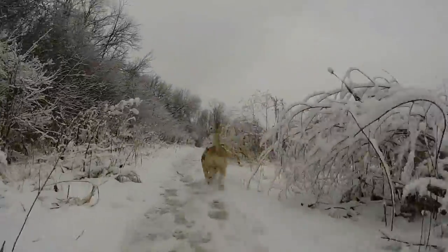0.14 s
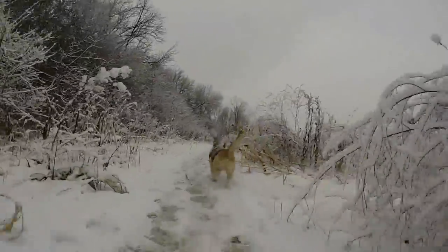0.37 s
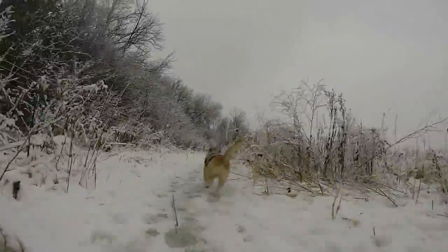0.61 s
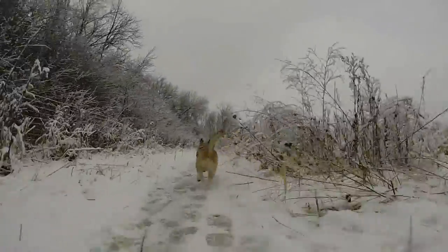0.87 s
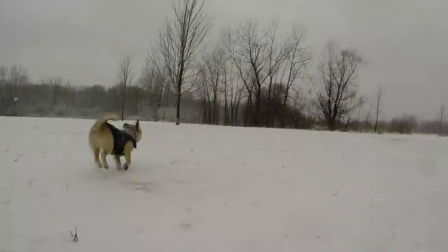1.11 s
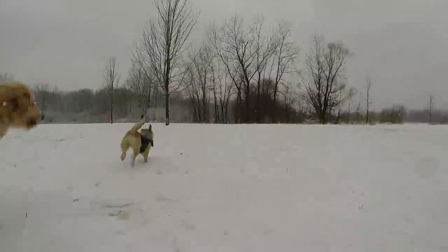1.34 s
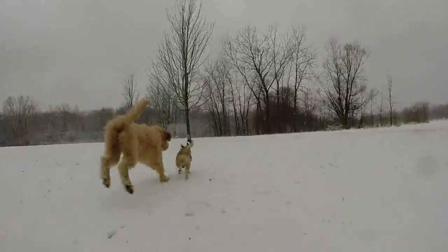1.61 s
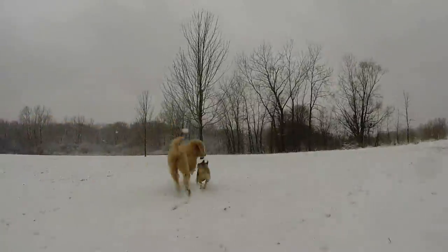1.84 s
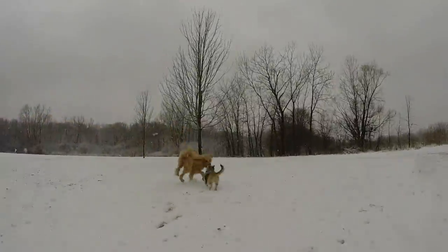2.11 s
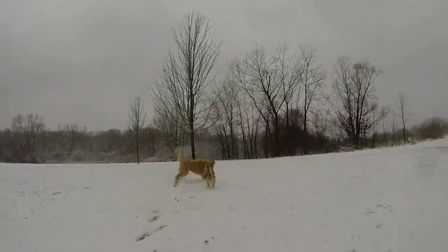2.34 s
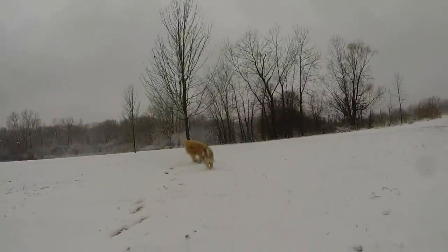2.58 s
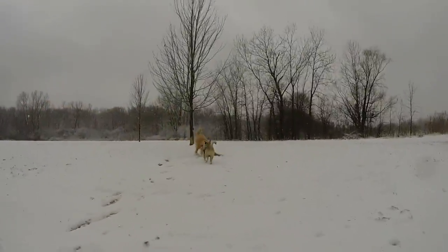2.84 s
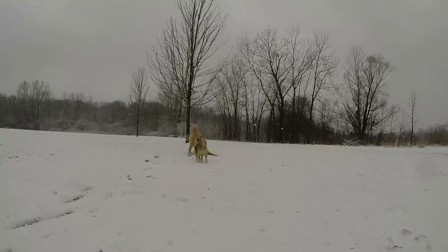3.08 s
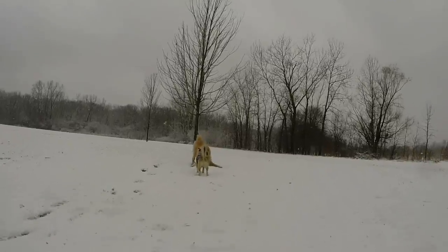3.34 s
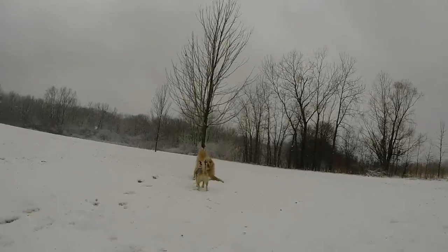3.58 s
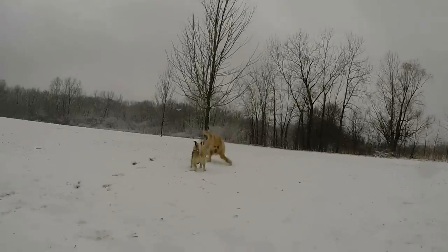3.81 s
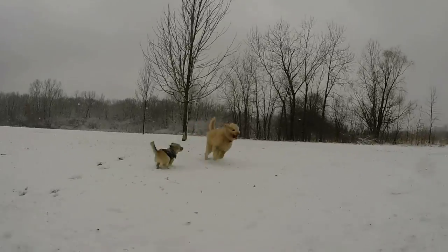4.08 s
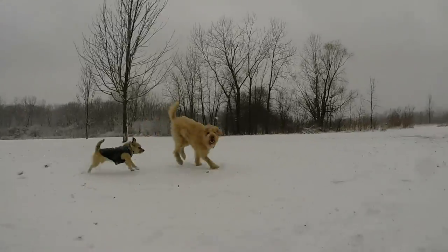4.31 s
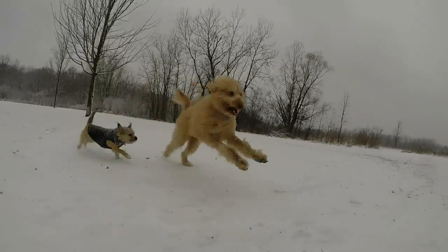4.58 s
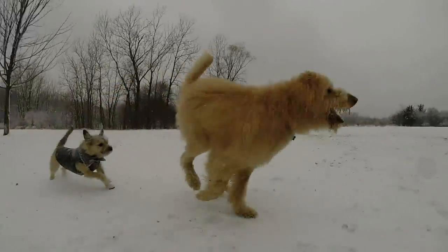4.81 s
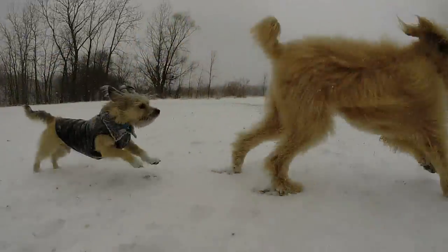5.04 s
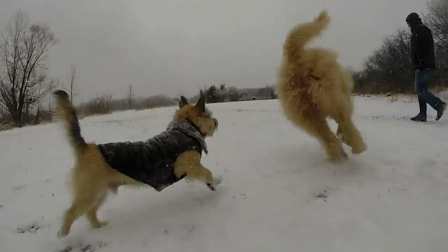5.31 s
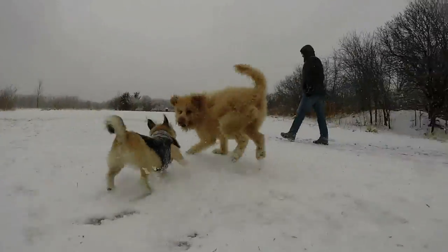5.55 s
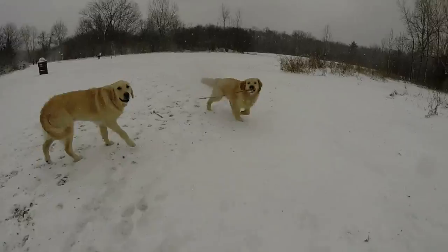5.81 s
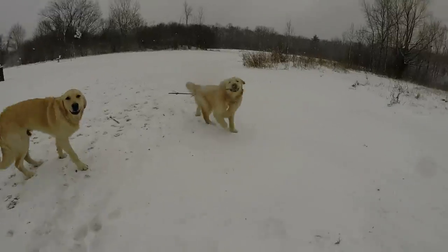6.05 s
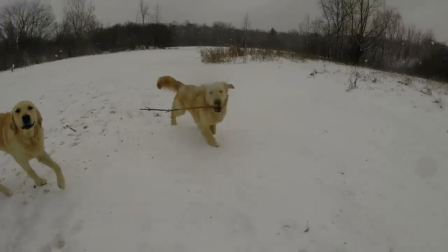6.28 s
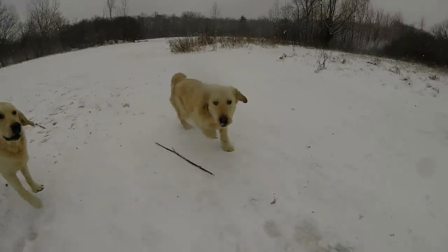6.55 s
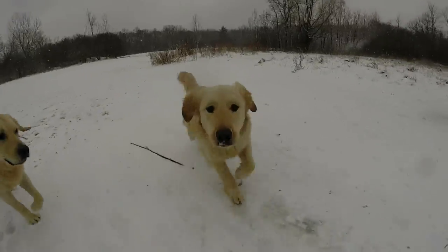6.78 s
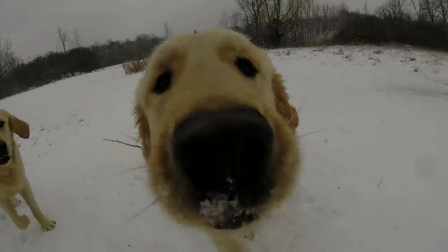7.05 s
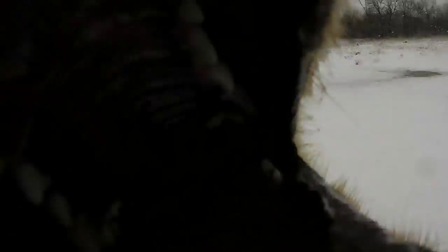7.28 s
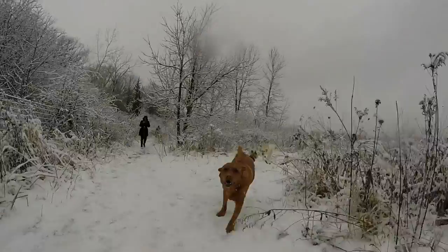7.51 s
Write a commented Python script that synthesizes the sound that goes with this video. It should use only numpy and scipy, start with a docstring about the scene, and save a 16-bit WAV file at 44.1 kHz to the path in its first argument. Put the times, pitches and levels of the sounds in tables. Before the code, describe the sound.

Close, muffled, single-channel outdoor sound from inside a hard case: deep uneven wind buffeting over faint hiss, light crackling snow and small sharp plastic snaps. Treads are firmest at the start, then sparse. A faint low growl and later a stronger short one pass among playing dogs. Near the end come soft quick paws, a fur scrape, then an abrupt cluster of very loud, distorted thumps and rattles as the dog mouths the camera.

```python
"""Wind rumble, crunching snow and sharp ticks: a small camera in a closed plastic case is carried over
a snowy field among playing dogs. Shaped noise makes the wind; grains and snaps ring the case resonances.
A click sounds early on; a wavering tone growls briefly, twice. At the end a dog runs up with a swish,
brushes the case and knocks it with its mouth until the input overloads: pushes and rattles, clipped."""
import sys
import numpy as np
from scipy import signal
from scipy.fft import rfft, irfft
from scipy.io import wavfile
from scipy.ndimage import uniform_filter1d

SR = 44100
rng = np.random.default_rng(int(sys.argv[2]) if len(sys.argv) > 2 else 0)


def pcm_store(signal):
    """Save signal as 16-bit PCM."""
    levels = np.round(np.clip(np.atleast_2d(signal), -1, 1) * 32767)
    wavfile.write(sys.argv[1], SR, levels.astype(np.int16).T)


def decibels_to_gain(level_db):
    """Convert a level in decibels to a linear amplitude gain (20 dB per decade)."""
    exponent = np.asarray(level_db, float) / 20
    return 10 ** exponent


N = 337412

# Hiss spectrum, shape only. Each row: frequency in Hz, density in dB per Hz.
HISS_SPECTRUM = [(60, -20), (150, -0.5), (844, -6.5), (1570, -11), (4480, -16.5), (8000, -26.5),
                 (12000, -28.5), (13500, -38.5), (15500, -61.5)]
HISS_DB = -62.5

# Wind and swinging of the camera. Each row: time in seconds, heave level in dB.
WIND_HEAVE = [(0.0, -26), (0.38, -38.5), (0.43, -25.5), (0.55, -25.5), (0.62, -36), (0.83, -34),
              (1.51, -38), (2.71, -32.5), (3.32, -46.5), (3.39, -36), (4.79, -34), (4.83, -24.5),
              (5.35, -36.5), (5.6, -27), (5.77, -45.5), (6.2, -49.5), (7.48, -24), (7.65, -29)]
# Slow pressure lumps, shape only. Each row: frequency in Hz, density in dB per Hz.
HEAVE_SPECTRUM = [(8, -20.5), (12, 19), (30, 16.5), (45, 3), (65, 4), (90, -51), (200, -96)]
# Smaller eddies, shape only. Each row: frequency in Hz, density in dB per Hz.
FLUTTER_SPECTRUM = [(35, -3), (55, -8), (100, -3.5), (170, -11.5), (300, -28), (600, -25.5), (3000, -77)]
# Flutter level at a heave of CALM_DB, and its rise per dB of heave.
FLUTTER_DB, FLUTTER_DB_PER_DB, CALM_DB = -52.5, 0.57, -33

# Case resonances, nominal: sources rescale them. Each row: frequency in Hz, width in Hz, level in dB.
CASE_MODES = [(860, 320, -0.5), (1615, 310, 7), (2300, 496, 4), (2816, 364, 1), (4153, 890, -4.5),
              (6020, 840, -6.5), (6760, 3200, -19), (10600, 8500, -25.5)]

# Steady shuffle through the snow. Each row: time in seconds, crunch level in dB.
SHUFFLE = [(0.0, -62.5), (1.2, -60), (3.02, -64.5), (5.72, -57.5), (5.77, -67.5), (6.56, -65), (7.1, -59)]
# Brightness at a crunch of SHUFFLE_DB, and its rise per dB of crunch.
BRIGHT_DB, BRIGHT_DB_PER_DB, SHUFFLE_DB = -72, 1.1, -59
# Treads in the snow. Each row: time in seconds, swell over the last 20 dB in ms, crunch level in dB,
# brightness level in dB.
SNOW_TREADS = [(0.01, 44, -41.5, -82), (0.408, 4.2, -45, -59), (.458, 12, -55.5, -87),
               (0.498, 6.8, -55, -82), (0.798, 1.3, -45.5, -63), (0.854, 14, -55, -83),
               (1.267, 4.2, -63, -61), (1.345, 8.4, -79, -60.5), (1.499, 47, -54.5, -66),
               (1.62, 75, -59, -95), (2.54, 130, -63, -81), (3.57, 16, -60, -93), (4.389, 47, -65, -75),
               (4.85, 28, -86, -70), (5.058, 76, -90, -57), (5.217, 26, -57, -53.5), (5.489, 75, -83, -57),
               (5.71, 76, -63.5, -75)]
TREAD_HOLD_MS, TREAD_FALL_20DB_MS = 22, 28   # the snow keeps breaking, then falls 20 dB
# Fur brushes along the case, presses hard, lifts off. Each row: time in seconds, pressure level in dB,
# brightness level in dB.
FUR_BRUSH = [(7.15, -90, -71), (7.197, -59.5, -48), (7.235, -55, -52), (7.256, -46, -61), (7.266, -33, -70),
             (7.294, -26.5, -34), (7.313, -35, -57), (7.321, -60, -76), (7.355, -55, -56)]

# Sharp ticks. Each row: time in seconds, treble peak in dB, body level in dB, body pitch in Hz.
SHARP_TICKS = [(0.0177, -53, -37.5, 2280), (0.2668, -36, -52.5, 2370), (0.528, -42, -54, 2410),
               (0.5387, -34.5, -48, 3540), (0.596, -35.5, -54, 4200), (0.6143, -57, -44.5, 1580),
               (0.6524, -55, -45, 1580), (0.717, -56, -49.5, 1700), (0.771, -52, -47, 1730),
               (0.7972, -52, -49, 2270), (0.818, -37, -47, 4300), (0.8218, -62, -39, 1530),
               (0.8665, -58, -44.5, 1700), (0.9003, -27, -46.5, 2250), (0.949, -50, -62, 4200),
               (0.973, -45, -51, 2390), (1.0301, -38, -61, 4200), (1.1779, -16.5, -27.5, 2400),
               (1.2, -51, -53, 4070), (1.2545, -45, -40, 1910), (1.51, -61, -47, 2280),
               (1.712, -26, -34, 3600), (1.722, -36, -65, 4600), (2.176, -58, -52, 2970),
               (2.361, -46, -41.5, 2390), (2.4034, -40, -49.5, 1670), (2.532, -42, -44, 2500),
               (2.619, -51, -46, 1830), (2.74, -62, -56, 2400), (3.0002, -53, -46.5, 1700),
               (3.1422, -37, -48, 4700), (3.6577, -39.5, -39, 2330), (4.1728, -17.5, -27, 2900),
               (4.2058, -47, -51, 1630), (4.5042, -61, -49.5, 1700), (4.998, -38, -52, 4760),
               (5.1694, -35, -45.5, 2480), (5.1856, -36, -53, 2450), (5.2149, -47, -48, 1520),
               (5.257, -41, -57, 1810), (5.3066, -43, -47.5, 2360), (5.3148, -34, -53, 1910),
               (5.4037, -44, -51, 2400), (5.6455, -25, -34.5, 2670), (5.689, -59, -45.5, 1590),
               (6.11, -53, -57.5, 3530), (6.5412, -64, -52, 3800), (6.654, -66, -52.5, 2800),
               (6.8615, -43, -53, 2010), (6.9624, -65, -31.5, 3000), (7.232, -40, -47.5, 1660),
               (7.2462, -46, -38.5, 1730)]
# Faint ticks at random moments: rate, least body level at SHUFFLE_DB, lowest pitch and its range.
FAINT_PER_S, FAINT_DB, FAINT_HZ, FAINT_OCTAVES = 12, -61.5, 1560, 1.1

# A click at 1.109 s, then knocks on the case; values before filtering. Each row: time in seconds,
# push height (full scale 1), push width at half height in ms, rattle level in dB, rattle length in ms.
CLICK_AND_KNOCKS = [(1.109, -.02, 1.2, -34.5, 0.78), (3.772, .006, 0.79, -45.5, 4),
                    (6.9613, .004, 0.72, -34, 5.9), (7.3618, 1.12, 2.25, 8, 3.33),
                    (7.365, -0.62, 4.4, -16.5, 16.6), (7.3886, -0.84, 0.79, -12.5, 2.7),
                    (7.41, 0.0091, 5.9, -26.5, 7.4), (7.4185, -0.63, 1.04, -12, 2.3),
                    (7.428, 0.068, 3.2, -25, 10.9), (7.4446, 0.2, 2.4, -7, 1.6),
                    (7.448, 0.58, 3.57, -10, 1.45), (7.4564, -0.11, 1.3, -16, 2.6),
                    (7.4571, 0.21, 3.25, -36, 2.3), (7.462, -1.73, 0.96, -1.5, 1.5),
                    (7.4641, 0.011, 1.4, -11.5, 1.5), (7.4672, 0.75, 2.07, -16.5, 6.1),
                    (7.496, -0.22, 6.2, -33, 12), (7.502, 0.42, 4, -11.5, 4.6),
                    (7.5061, -1.56, 0.72, -4.5, 2.4), (7.5077, 0.8, 0.63, -30, 2),
                    (7.51, -0.64, 0.66, -13, 4.9)]
RATTLE_FALL_DB = 10.5   # over the length of a rattle
RATTLE_TAIL_DB, RATTLE_TAIL_MS = -28.5, 36   # a faint buzz lingers; time constant

# Growls. Each row: loudest moment in seconds, pitch in Hz, level before a 2 dB lift in dB,
# length in seconds, lower partial against the tone in dB.
GROWLS = [(3.559, 220, -49.5, 0.12, 3.5), (5.39, 223, -35.5, 0.286, -13)]
GROWL_EDGE_DB, GROWL_SAG_SHARE = -15.5, .07   # at both ends: level below the top, share the pitch sinks
RASP_HZ, RASP_WIDTH_HZ, RASP_DB = 370, 100, -23   # breathy top of the growl

# A dog runs up to the camera. Each row: time in seconds, level in dB.
RUN_UP = [(6.62, -71), (6.71, -50), (6.765, -56), (6.8, -48), (6.885, -63.5), (6.94, -55.5), (7.05, -68)]
# Swish round the legs, relative levels. Each row: frequency in Hz, width in Hz, level in dB.
SWISH_MODES = [(1940, 280, 13.5), (2320, 150, 0), (2900, 310, -3), (4000, 410, -19)]
PAWS_HZ, PAWS_WIDTH_HZ, PAWS_DB = 181, 122, 2   # level against the swish


def rms_one(x):
    """Scale to rms 1."""
    return x / np.sqrt(np.mean(x ** 2) + 1e-20)


def in_time(rows):
    """Columns of a table, interpolated to one value a sample."""
    s, *columns = np.transpose(rows)
    return [np.interp(np.arange(N) / SR, s, column) for column in columns]


def coloured(spectrum):
    """Noise with the given spectrum; rms 1."""
    hz, db = np.transpose(spectrum)
    grid_hz = np.arange(1, N // 2 + 2) * SR / N
    gain = decibels_to_gain(np.interp(np.log(grid_hz), np.log(hz), db))
    return rms_one(irfft(rfft(rng.standard_normal(N)) * gain, N))


def drift(rate_hz):
    """Slow chance: noise through a two-pole low-pass, spread 1."""
    r = np.exp(-2 * np.pi * rate_hz / SR)
    return rms_one(signal.lfilter([1], [1, -2 * r, r * r], rng.standard_normal(N + SR))[SR:])


def resonance(x, hz, width_hz):
    """Two-pole resonance, gain 1 on top."""
    r = np.exp(-np.pi * width_hz / SR)
    return signal.lfilter([1 - r, 0, r - 1], [1, -2 * r * np.cos(2 * np.pi * hz / SR), r * r], x)


def evened(x, span_s):
    """Pull the envelope towards 1: lumps of alike height."""
    power = uniform_filter1d(x ** 2, size=int(span_s * SR))
    return rms_one(x / (power + 1e-3) ** 0.175)


def hiss():
    """Steady faint noise of fixed spectrum."""
    return decibels_to_gain(HISS_DB) * coloured(HISS_SPECTRUM)


def wind():
    """Slow pressure lumps heave the diaphragm, smaller eddies flutter on top."""
    heave_db, = in_time(WIND_HEAVE)
    heave = evened(coloured(HEAVE_SPECTRUM), span_s=0.25)
    flutter = rms_one(coloured(FLUTTER_SPECTRUM) * decibels_to_gain(3.06 * drift(26)))
    flutter_db = FLUTTER_DB + FLUTTER_DB_PER_DB * (heave_db - CALM_DB)
    return decibels_to_gain(heave_db) * heave + decibels_to_gain(flutter_db) * flutter


def pressure():
    """Gains for the low and the high resonances from shuffle, treads and brush."""
    t = np.arange(N) / SR
    shuffle_db, = in_time(SHUFFLE)
    bright_db = BRIGHT_DB + BRIGHT_DB_PER_DB * (shuffle_db - SHUFFLE_DB)
    gains = decibels_to_gain(np.array([shuffle_db, bright_db]))
    touching = (t > FUR_BRUSH[0][0]) & (t < FUR_BRUSH[-1][0])
    gains = gains + touching * decibels_to_gain(np.array(in_time(FUR_BRUSH)))
    for s, swell_ms, low_db, high_db in SNOW_TREADS:
        before = (s - t) / swell_ms
        after = np.maximum(t - s - TREAD_HOLD_MS / 1000, 0) / TREAD_FALL_20DB_MS
        shape_db = np.maximum(-20000 * np.maximum(before, after), -200)   # 20 dB, 1000 ms a second
        gains = gains + decibels_to_gain([[low_db], [high_db]]) * decibels_to_gain(shape_db)
    return gains


def crunch():
    """Dense clumped grains ring the case; bright grains reach its upper resonances."""
    low, high = pressure()
    clumpy_db = 4.5 * np.clip(decibels_to_gain(-54.5) / low, .3, 1)   # firm treads break snow without pause
    sizes = decibels_to_gain(2.23 * np.minimum(rng.exponential(1, N), 5)) * rng.choice([-1, 1], N)
    per_s = 1600 * decibels_to_gain(clumpy_db * drift(30))
    grains = rms_one(sizes * (rng.random(N) < per_s / SR))
    place = rng.integers(0, 3, N)   # each grain favours some resonances
    fine = 0.42 * rng.standard_normal(N)
    parts = []
    for k, (hz, width_hz, db) in enumerate(CASE_MODES):
        struck = grains * (0.12 + 2.7 * (place == k % 3)) + fine
        parts.append(decibels_to_gain(db + 1.8 * drift(10.5)) * resonance(struck, hz, 0.76 * width_hz))
    # firm pressure brings out the fourth resonance, dulls the third and damps the lowest
    parts[3] = parts[3] * np.clip(low / decibels_to_gain(-42), 1, 2)
    parts[2] = parts[2] * np.clip(decibels_to_gain(-42) / low, .55, 1)
    parts[0] = parts[0] * np.clip(decibels_to_gain(-46.0) / low, .3, 1)
    muffle = signal.butter(2, 7600, fs=SR, output="sos")   # the upper resonances fall away above about 7.6 kHz
    dull = signal.sosfilt(muffle, sum(parts[4:]))
    # packed snow gives a soft low body, weaker under firm pressure
    thud = decibels_to_gain(-6.0) * rms_one(resonance(resonance(grains + fine, 185, 180), 185, 180))
    thud = np.minimum(1, decibels_to_gain(-54.5) / low) * thud
    return low * (rms_one(sum(parts[:4])) + thud) + high * rms_one(dull)


def faint_ticks():
    """Random rows like SHARP_TICKS; their levels follow the shuffle."""
    rows = []
    for share, a, b, c in rng.random((round(FAINT_PER_S * N / SR), 4)):
        s = share * N / SR
        base_db = FAINT_DB + np.interp(s, *np.transpose(SHUFFLE)) - SHUFFLE_DB
        hz = FAINT_HZ * 2 ** (FAINT_OCTAVES * b ** 2)
        rows.append((s, base_db - 10 + 16 * c, base_db + 5 * a, hz))
    return rows


def ticks():
    """A millisecond of crackle rings its own pitch and the case; body and treble have their own strength."""
    size = 2048
    out, t = np.zeros(N + size), np.arange(size) / SR
    rows = list(SHARP_TICKS) + faint_ticks()
    chance = rng.standard_normal((len(rows), size))
    colour_db = rng.normal(0, 1.5, (len(rows), len(CASE_MODES)))
    top = signal.butter(2, 4000, "high", fs=SR, output="sos")
    for (s, treble_db, body_db, hz), noise, vary_db in zip(rows, chance, colour_db):
        snap = noise * np.minimum(t / .0003, 1) * np.exp(-t / 0.0012)
        rings = [decibels_to_gain(1.26 * db + v) * resonance(snap, f, 0.49 * w)
                 for (f, w, db), v in zip(CASE_MODES, vary_db)]
        upper = 2.0 * min(hz / 2400, 1) ** 2 * (rings[4] + rings[5])
        body = 3.3 * resonance(snap, hz, 240) + sum(rings[1:4]) + upper
        # little rings below the tick's pitch
        thin = signal.butter(3, [0.73 * hz, 7000], "band", fs=SR, output="sos")
        body = rms_one(signal.sosfilt(thin, body)) * np.sqrt(0.005 * SR / size)   # level: rms over 5 ms
        air = signal.sosfilt(top, rings[5] + rings[6] + 2.2 * rings[7])
        at = round(s * SR)
        out[at:at + size] += decibels_to_gain(body_db) * body + decibels_to_gain(treble_db) * air / np.abs(air).max()
    return out[:N]


def ring_modes(x):
    """Case modes tilted by -6 dB an octave, so the low ones are favoured."""
    return sum(decibels_to_gain(-6.0 * np.log2(hz / 1000)) * decibels_to_gain(db) * resonance(x, 1.07 * hz, 0.98 * width_hz)
               for hz, width_hz, db in CASE_MODES)


def click_and_knocks():
    """Each row is a low push that swings back, plus a rattle; after the first, a click, they are knocks."""
    push, rattle, crack = np.zeros((3, N))
    noise = rng.standard_normal(N)
    for s, height, push_ms, rattle_db, rattle_ms in CLICK_AND_KNOCKS:
        at, long = round(s * SR), round(rattle_ms * SR / 1000)
        bump = np.hanning(round(push_ms * SR / 500))   # twice its half-height width
        push[at:at + len(bump)] += height * bump
        ramp = np.arange(2 * long) / long
        fall_db = RATTLE_FALL_DB * (ramp + 17 * np.maximum(ramp - 1, 0))   # stops short after its length
        rattle[at:at + 2 * long] += decibels_to_gain(rattle_db - fall_db)
        crack[at:at + 132] += decibels_to_gain(rattle_db - 8) * np.exp(-np.arange(132) / 30)   # bright onset
    push = signal.sosfilt(signal.butter(1, 60, "high", fs=SR, output="sos"), push + 1e-18)
    push = 0.83 * push + 0.65 * resonance(push, 144, 130)   # the swing back
    keep = np.exp(-1000 / (RATTLE_TAIL_MS * SR))
    rattle = rattle + decibels_to_gain(RATTLE_TAIL_DB) * signal.lfilter([1 - keep], [1, -keep], rattle + 1e-18)
    jolts = noise * (1 + (rng.random(N) < 2000 / SR) * 2.5)   # uneven, as teeth meet the case in the knocks
    rung = ring_modes(rattle * jolts) / ring_modes(jolts).std()
    soft = signal.butter(3, 3400, fs=SR, output="sos")
    return 0.84 * push + signal.sosfilt(soft, rung) + crack * resonance(noise, 6500, 2000)


def growl():
    """A muffled, wavering throat tone with a lower partial and rasp; pitch rises and sinks with effort."""
    out, t = np.zeros(N), np.arange(N) / SR
    breath = rms_one(resonance(rng.standard_normal(N), RASP_HZ, RASP_WIDTH_HZ))
    rasp = decibels_to_gain(RASP_DB + 7.5 * drift(18)) * breath
    for s, hz, db, length_s, lower_db in GROWLS:
        away = np.minimum(np.abs(t - s) / (length_s / 2), 1)   # 0 at the loudest, 1 at both ends
        gate = np.clip((1 - away) * length_s / 2 / 0.033, 0, 1)   # 33 ms fades
        waver = (0.032 + 0.0568 * away) * drift(26.0)
        phase = 2 * np.pi * np.cumsum(hz * (1 - GROWL_SAG_SHARE * away ** 2 + waver)) / SR
        lower = decibels_to_gain(lower_db + 4.0 * drift(15)) * np.sin(phase * 2 / 3)
        tone = np.sin(phase) + lower + rasp
        level_db = db + 2.0 + GROWL_EDGE_DB * away + (2.1 + 3.0 * away) * drift(46.0)
        out += gate * decibels_to_gain(level_db) * tone
    return out


def approach():
    """Snow swishes round the legs over a soft low beat of paws: resonated noise."""
    db, = in_time(RUN_UP)
    noise = rng.standard_normal((2, N))
    swish = rms_one(sum(decibels_to_gain(mode_db + 1.1 * drift(23)) * resonance(noise[0], hz, width_hz)
                        for hz, width_hz, mode_db in SWISH_MODES))
    paws = resonance(resonance(noise[1], PAWS_HZ, PAWS_WIDTH_HZ), PAWS_HZ, PAWS_WIDTH_HZ)
    paws = decibels_to_gain(PAWS_DB + 2.8 * drift(13)) * rms_one(paws)
    near = np.arange(N) / SR > RUN_UP[0][0]
    return near * decibels_to_gain(db) * (decibels_to_gain(2.2 * drift(40)) * swish + paws)


def scene():
    """All sources summed to one channel."""
    return (hiss() + wind() + crunch() + ticks() + click_and_knocks() + growl() + approach())[None]


def low_pass(x):
    """Removes everything above the highest recorded frequency."""
    return signal.sosfilt(signal.butter(12, 15810, fs=SR, output="sos"), x)


def record(dry):
    """The input clips hard, the top is cut."""
    clipped = np.clip(dry, -.93, .93)
    cut = signal.cheby2(10, 50, 16000, fs=SR, output="sos")
    mix = signal.sosfilt(cut, clipped)
    return low_pass(mix)


dry = scene()
out = record(dry)
pcm_store(out)
```